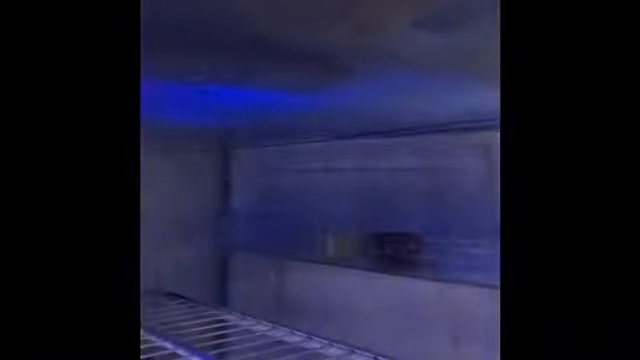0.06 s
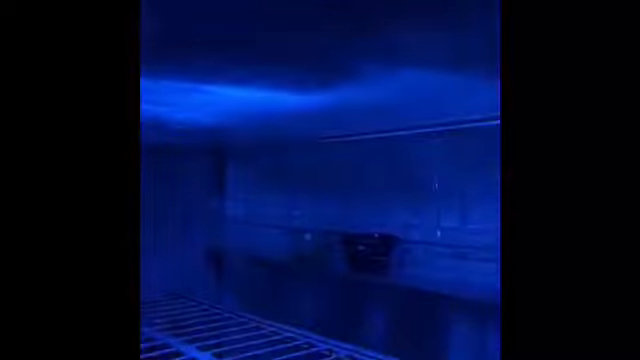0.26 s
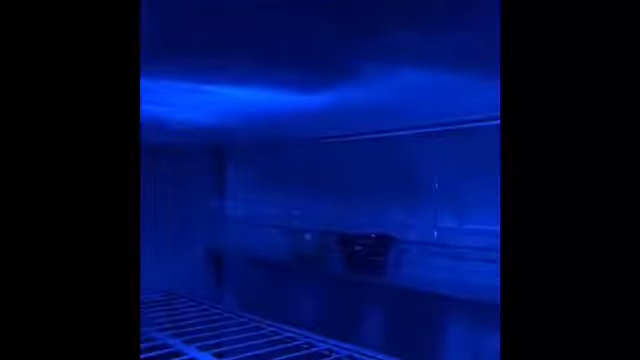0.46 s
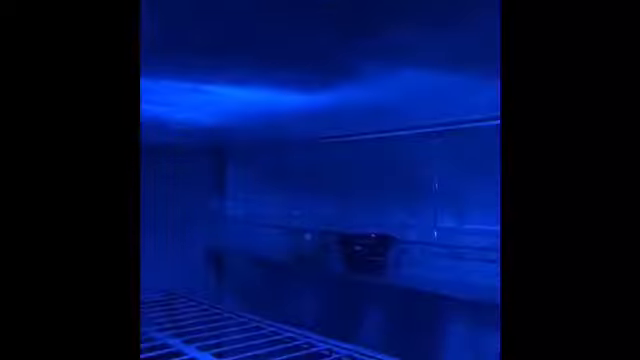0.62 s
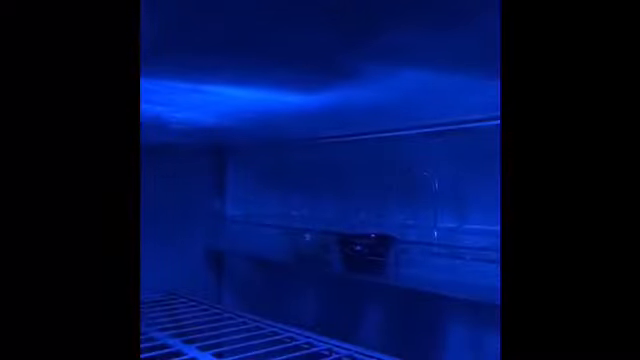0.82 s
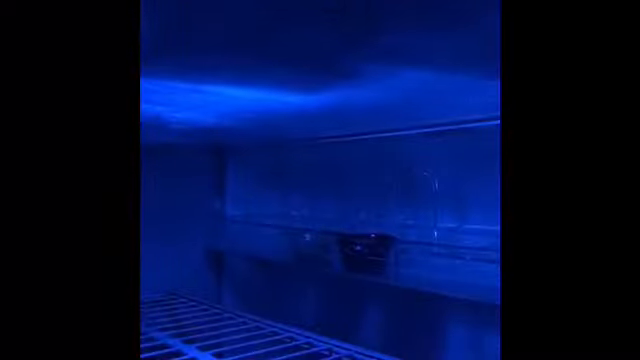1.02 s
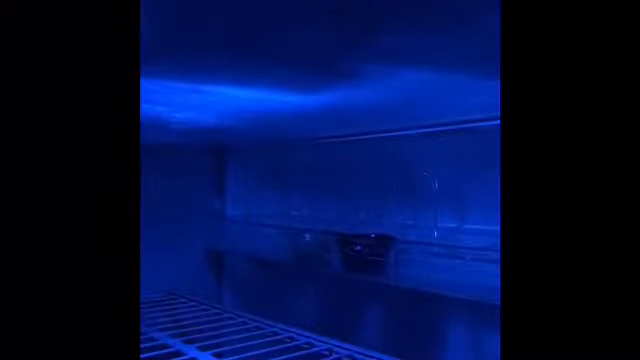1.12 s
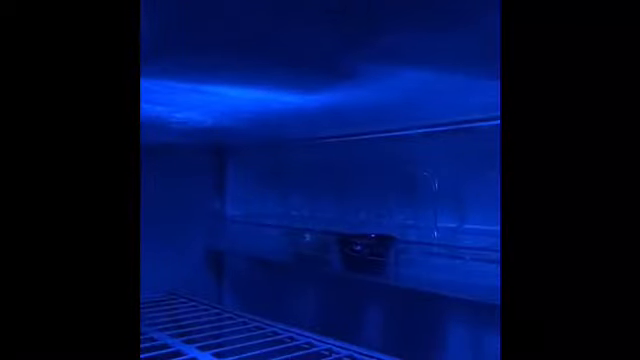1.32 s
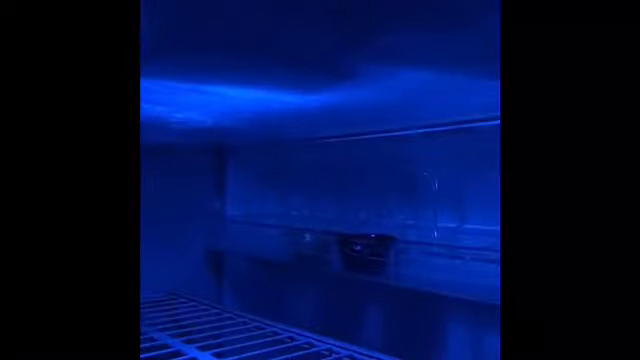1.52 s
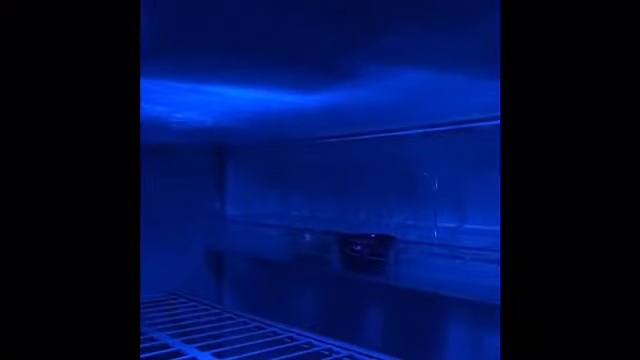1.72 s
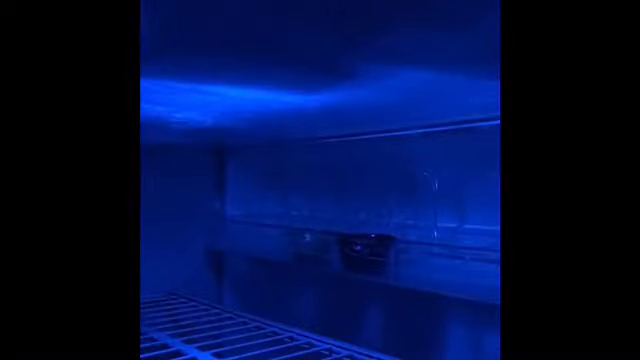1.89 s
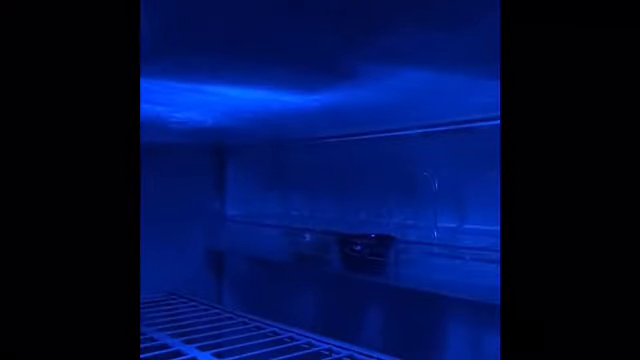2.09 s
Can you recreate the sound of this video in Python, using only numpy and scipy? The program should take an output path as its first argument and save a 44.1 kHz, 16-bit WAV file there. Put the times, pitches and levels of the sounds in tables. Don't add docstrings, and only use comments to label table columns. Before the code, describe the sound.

Heard from a shelf inside a fridge: low hum and faint room noise, small clicks and a squeak, a loud booming door slam with plastic rattle and air hiss, then quiet humming and tiny knocks.

```python
import sys
import numpy as np
from scipy import signal
from scipy.fft import rfft, irfft
from scipy.io import wavfile
from scipy.ndimage import map_coordinates

SR = 44100
rng = np.random.default_rng(int(sys.argv[2]) if len(sys.argv) > 2 else 0)


def store_wav(level_fs):
    pcm = np.round(np.clip(np.atleast_2d(level_fs), -1, 1) * 32767)
    wavfile.write(sys.argv[1], SR, pcm.T.astype(np.int16))


def magnitude_from_level(level_db):
    exponent = np.asarray(level_db, float) / 20
    return 10 ** exponent


N = 94815

# time [s], level [dB].
HUM_LEVEL = [(0, -33.5), (.06, -33), (.118, -43), (.19, -26.5), (.235, -28), (.31, -24.5), (.345, -48),
             (.45, -25), (.7, -49.5), (1.0, -48), (2.15, -57)]
# multiple of the hum, level under the hum [dB].
HUM_ORDERS = [(2, -20), (3, -22.5)]
WHINE_HZ = [99, 146.5, 183, 226, 420, 818.3, 872, 920.5, 1023, 1136]
# level [dB], gain with the door open [dB].
WHINE_LEVELS = [(-61, -1.5), (-60, 10), (-55, 2), (-62, 1), (-65, 0.5), (-63.5, 4.5), (-75.5, -0.5),
                (-66, 11.5), (-70.5, -0.5), (-76.5, 12)]
# frequency [Hz], density [dB per Hz].
FAN_COLOUR = [(28, -5), (60, -11.5), (84, -10.5), (180, -3), (480, -23.5), (1000, -24), (2300, -39),
              (16000, -65)]
# time [s], level [dB].
FAN_LEVEL = [(0, -46.5), (.35, -36.5), (.6, -47), (.96, -46.5), (1.0, -47), (2.15, -48.5)]
# frequency [Hz], density [dB per Hz].
ROOM_COLOUR = [(300, -17.5), (600, -8), (1000, 3), (1500, -5.5), (3000, -21), (6000, -24.5), (12000, -54)]
# centre [Hz], level [dB], width [Hz].
CABINET_BANDS = [(309.5, -57, 140), (3400, -81, 590), (3950, -83, 310), (4845, -87, 150),
                 (5780, -85.5, 600)]
# start [s], rms level [dB], centre [Hz], width [octaves], t60 [s].
TICKS = [(0.134, -66.5, 6740, 0.5, 0.065), (.182, -54.5, 6000, 1.15, 0.091),
         (0.2047, -30.5, 720, 1.23, 0.062), (0.2046, -40.5, 3240, 1.2, 0.061), (.216, -39, 610, 1.2, 0.075),
         (0.212, -33.5, 109, .5, .1), (.2695, -32.5, 860, 2.3, 0.077), (0.2704, -38, 2800, 0.33, 0.039),
         (0.2693, -41.5, 6030, 0.35, .055), (0.2675, -48, 8500, 1.4, 0.042), (0.607, -55, 7000, 4.1, 0.062),
         (.638, -53.5, 1560, 0.24, 0.035), (.669, -64.5, 9000, 1.1, .03), (0.682, -54.5, 7260, 2.5, 0.052),
         (0.912, -60, 5360, 1, 0.039), (.9665, -39.5, 553, 1.44, 0.05), (0.974, -41.5, 240, 0.28, 0.14),
         (0.9967, -40, 1140, 1.3, 0.062), (0.9985, -44, 2600, 0.68, 0.027), (1.325, -61, 4800, 0.98, 0.043)]
# start [s], peak level [dB], start pitch [Hz], end pitch [Hz], t60 [s].
PLUNGER_SQUEAK = (.270, -36, 2300, 3250, .065)
# frequency [Hz], density [dB per Hz].
AIR_COLOUR = [(1500, -10), (3000, -3), (4000, -3.5), (6000, -7), (10500, -22), (14300, -18.5), (15700, -19),
              (15900, -49.5)]
# time [s], level [dB].
AIR_LEVEL = [(.3, -71), (.36, -65), (.385, -44), (.45, -48.5), (.52, -53.5), (.56, -66.5), (.965, -64.5),
             (.972, -100), (1.7, -85.5), (2.0, -71.5), (2.15, -72)]
# start [s], rms level [dB], centre [Hz], width [octaves], t60 [s].
CRACKS = [(0.365, -40.5, 1370, 0.66, 0.14), (.382, -25, 306, 1.6, 0.14), (.3838, -19, 4990, 0.49, .028),
          (.3835, -32.5, 8000, .8, 0.016), (.385, -23, 2400, 1.2, .06), (.395, -41, 4490, .9, .07),
          (.42, -42.5, 820, 1.3, 0.12), (0.4523, -26.5, 1435, 0.38, 0.12),
          (0.4526, -36.5, 3600, 0.79, 0.072), (.457, -28.5, 1013, 0.2, 0.11), (0.465, -32, 464, 1.17, 0.15),
          (0.471, -32, 1470, 0.15, 0.038), (.487, -23.5, 464, 1.8, 0.077), (0.492, -34.5, 1300, 0.6, 0.087),
          (0.503, -35.5, 2900, 1.24, 0.051), (.505, -34.5, 297, 0.62, 0.15), (.55, -42.5, 302, 0.54, 0.062),
          (0.539, -53, 1200, .7, 0.14)]
# frequency [Hz], level [dB], t60 [s].
LINER_MODES = [(420, -15, 0.0763), (630, -11.5, .08), (1010, -20, 0.3), (1140, -25.5, .08),
               (1432, 9.5, 0.032), (1849, -4.5, 0.088), (2900, -5, 0.037), (3320, 0.5, 0.033),
               (3730, 2, .044), (4037, -9.5, .05), (4820, -3, 0.01), (5090, -4.5, .03), (5580, -6.5, 0.014),
               (5884, -16.5, 0.0566)]
# start [s], peak level [dB], start pitch [Hz], end pitch [Hz], t60 [s].
BOOMS = [
    (0.3842, -0.5, 88, 41, 0.17),
    (0.425, -10.5, 45, 41.56, 0.13),
    (0.4655, -14, 76, 74, 0.19),
    (0.4862, -15.5, 220, 219, 0.092),
    (0.4935, -11.5, 90.7, 106.9, 0.25),
    (.502, -27.5, 103.3, 107.5, 0.76),
    (0.393, -13.5, 34, 27.7, .1),
]
# time [s], peak level [dB].
JAR_ROCKS = [
    (1.176, -36.5),
    (1.362, -47),
    (1.545, -41.5),
    (1.767, -41),
    (2.028, -45),
]
# frequency [Hz], level [dB], t60 [s].
JAR_MODES = [(620, 3, .12), (900, 0, .11), (1030, 3, .09), (1185, -5, .11), (1588, -9, .1)]


def unit(x):
    return x / np.sqrt(np.mean(x ** 2) + 1e-20)


def curve(rows):
    return np.interp(np.arange(N) / SR, *np.transpose(rows))


def wobble(rate, size=N):
    knots = rng.standard_normal(int(size * rate / SR) + 4)
    return map_coordinates(knots, [np.arange(size) * rate / SR])


def noise(gain, size=N):
    hz = np.fft.rfftfreq(size, 1 / SR) + 1
    return unit(irfft(rfft(rng.standard_normal(size)) * gain(hz), size))


def colour(points):
    f, db = np.transpose(points)
    return lambda hz: magnitude_from_level(np.interp(np.log(hz), np.log(f), db))


def dying(t, t60, rise):
    return magnitude_from_level(-60 * t / t60) * (1 - np.exp(-t / rise))


def add(out, s, x):
    part = out[round(s * SR):][:len(x)]
    part += x[:len(part)]


def ring(modes, rise):
    t = np.arange(SR // 4) / SR
    out = np.zeros(len(t))
    for hz, db, t60 in modes:
        tone = np.sin(2 * np.pi * (hz * t + rng.random()))
        out += magnitude_from_level(db + rng.normal(0, 2)) * dying(t, t60, rise) * tone
    return out


def crack(db, centre_hz, width, t60):
    rise_s, hold_power, grit_db = 0.0004, 1.5, 2.5
    t = np.arange(SR // 4) / SR
    shape = magnitude_from_level(-60 * (t / t60) ** hold_power) * (1 - np.exp(-t / rise_s))

    def band(hz):
        octaves = np.log2(hz / centre_hz)
        return 1 / np.sqrt(hz) / (1 + (octaves / width) ** 2) ** 2

    burst = shape * noise(band, size=len(t)) * magnitude_from_level(grit_db * wobble(300, size=len(t)))
    return magnitude_from_level(db) * burst * np.linalg.norm(shape) / np.linalg.norm(burst)


def cracks(rows):
    out = np.zeros(N)
    for s, *row in rows:
        add(out, s, crack(*row))
    return out


def gliding_tones(rows):
    glide_s, rise_cycles = 0.013, 0.28
    out, t = np.zeros(N), np.arange(SR // 2) / SR
    for s, db, start_hz, end_hz, t60 in rows:
        turns = end_hz * t + (start_hz - end_hz) * glide_s * (1 - np.exp(-t / glide_s))
        shape = dying(t, 2 * t60, rise_cycles / start_hz) ** 2
        add(out, s, magnitude_from_level(db) * shape * np.sin(2 * np.pi * turns))
    return out


def gap():
    shut_s, swing_s = 0.21, 0.016
    return 1 / (1 + np.exp((np.arange(N) / SR - shut_s) / swing_s))


def compressor():
    hum_hz, drift, hum_wobble_db = 47.02, 0.004, 1
    beat_hz, beat_null_s, fan_shaft_db = 9.32, 1.072, -60
    t = np.arange(N) / SR
    turn = 2 * np.pi * np.cumsum(hum_hz * (1 + drift * wobble(8.72))) / SR
    hum = np.sin(turn) + sum(magnitude_from_level(db) * np.sin(k * turn) for k, db in HUM_ORDERS)
    hum_gain = magnitude_from_level(curve(HUM_LEVEL) + hum_wobble_db * wobble(10))
    fan_shaft = -np.sin(turn - 2 * np.pi * beat_hz * (t - beat_null_s))
    whine = np.zeros(N)
    for hz, (db, open_db) in zip(WHINE_HZ, WHINE_LEVELS):
        level = magnitude_from_level(db + open_db * gap() + 0.5 * wobble(4))
        wander = np.cumsum(0.8 * wobble(5)) / SR
        whine += level * np.sin(2 * np.pi * (hz * t + wander))
    return -np.sqrt(2) * (hum * hum_gain + magnitude_from_level(fan_shaft_db) * fan_shaft + whine)


def fan():
    return noise(colour(FAN_COLOUR)) * magnitude_from_level(curve(FAN_LEVEL) + 0.52 * wobble(8.2))


def room():
    return noise(colour(ROOM_COLOUR)) * magnitude_from_level(-58.5) * gap()


def cabinet_bands():
    out = np.zeros(N)
    for hz, db, width in CABINET_BANDS:
        flutter = magnitude_from_level(db + 2 * wobble(8.74))
        out += flutter * noise(lambda f: 1 / (1 + (2 * (f - hz) / width) ** 4))
    return out


def switch_and_creaks():
    return cracks(TICKS)


def plunger():
    return gliding_tones([PLUNGER_SQUEAK])


def seal_air():
    return noise(colour(AIR_COLOUR)) * magnitude_from_level(curve(AIR_LEVEL) + wobble(40))


def seal_and_shelves():
    return cracks(CRACKS)


def liner():
    slam_s, slam_db, rise_s = 0.3838, -18, 0.0006
    out = np.zeros(N)
    add(out, slam_s, magnitude_from_level(slam_db) * ring(LINER_MODES, rise_s))
    return out


def trapped_air():
    return gliding_tones(BOOMS)


def jar():
    ring_db, rise_s, knock_db = -10.5, 0.002, -13.5
    out = np.zeros(N)
    for s, db in JAR_ROCKS:
        glass = magnitude_from_level(db + ring_db) * ring(JAR_MODES, rise_s)
        add(out, s, glass + crack(db + knock_db, 830, 0.97, 0.13))
    return out


def scene():
    machinery = compressor() + fan() + room() + cabinet_bands()
    door = switch_and_creaks() + plunger() + seal_air() + seal_and_shelves() + liner() + trapped_air()
    return (machinery + door + jar())[None]


def band_limit(x):
    return signal.sosfilt(signal.butter(12, 16670, fs=SR, output="sos"), x)


def record(dry):
    top_hz = 15800
    hz = np.fft.rfftfreq(N, 1 / SR)
    kept = irfft(rfft(dry) / (1 + (hz / top_hz) ** 200), N)
    return band_limit(kept)


dry = scene()
out = record(dry)
store_wav(out)
```